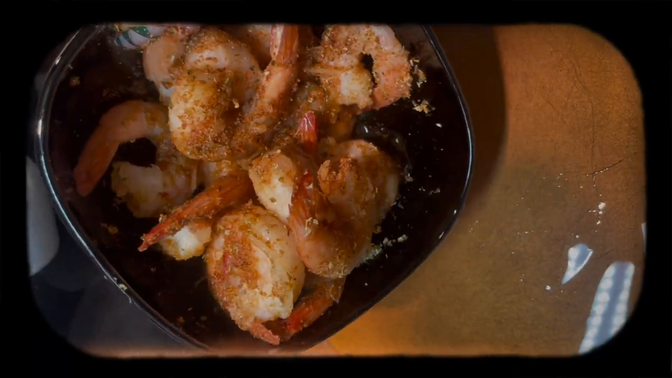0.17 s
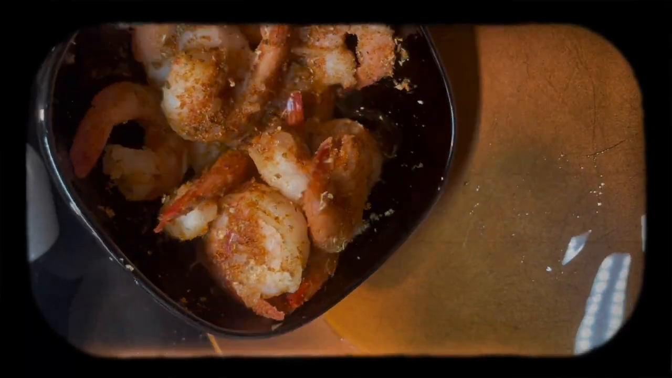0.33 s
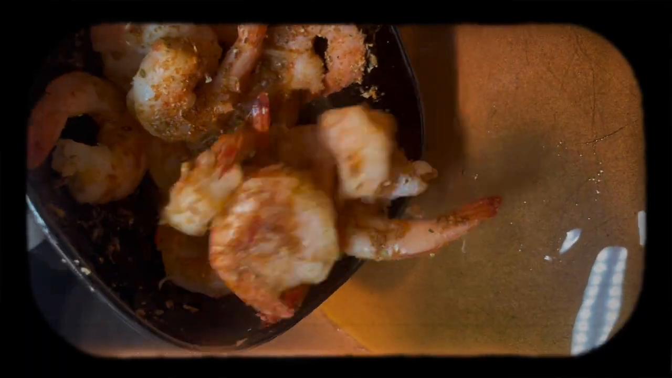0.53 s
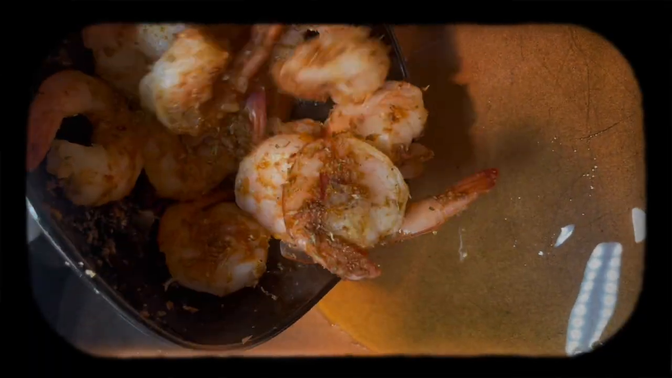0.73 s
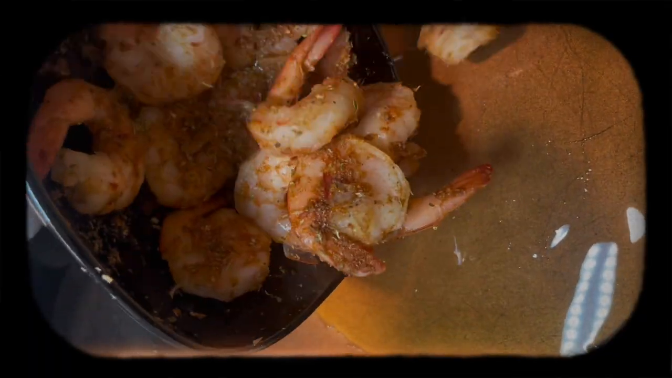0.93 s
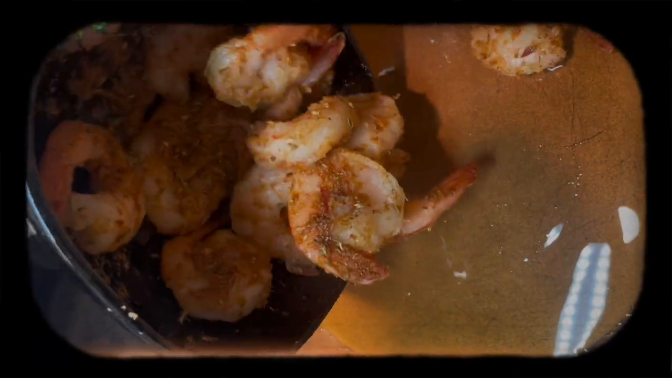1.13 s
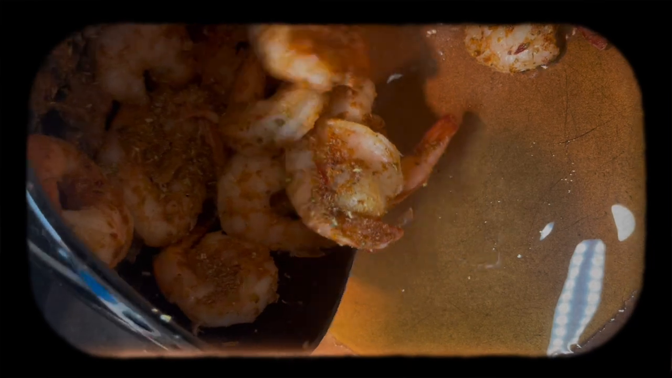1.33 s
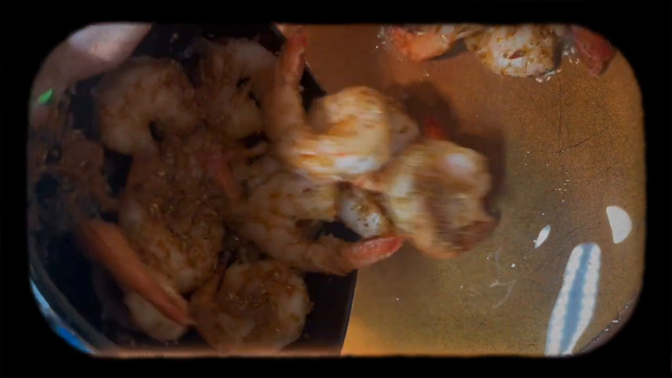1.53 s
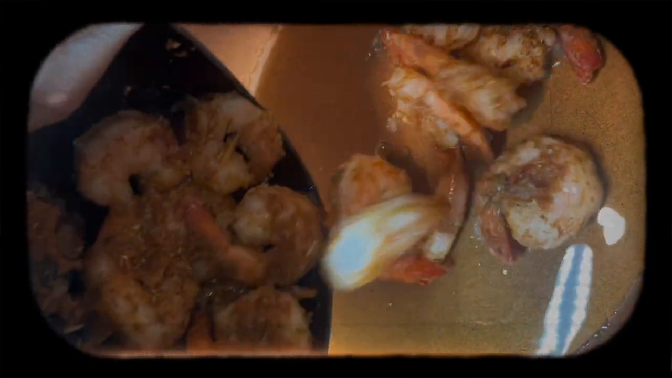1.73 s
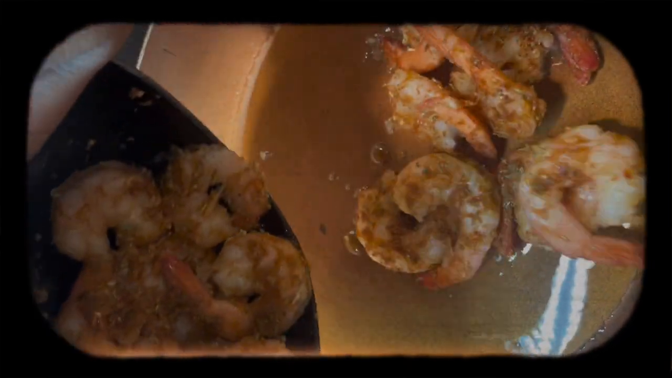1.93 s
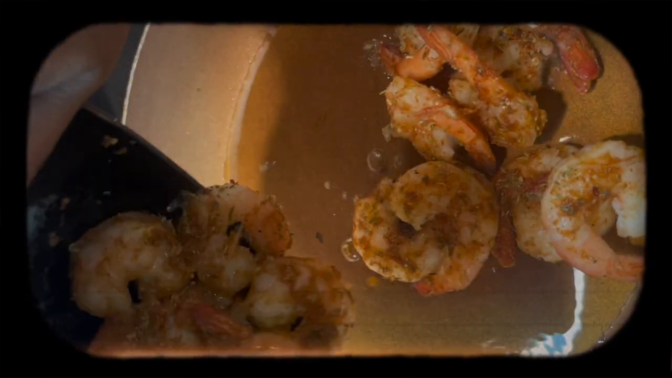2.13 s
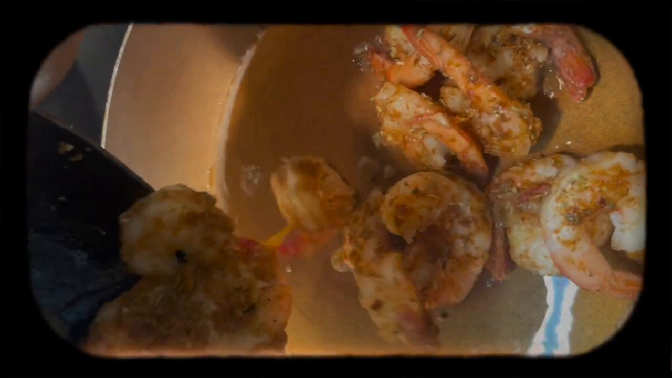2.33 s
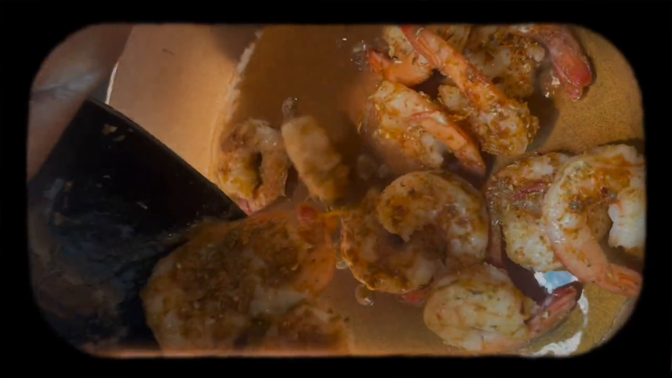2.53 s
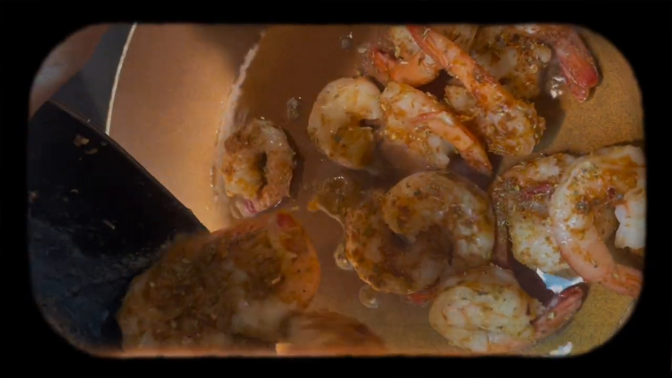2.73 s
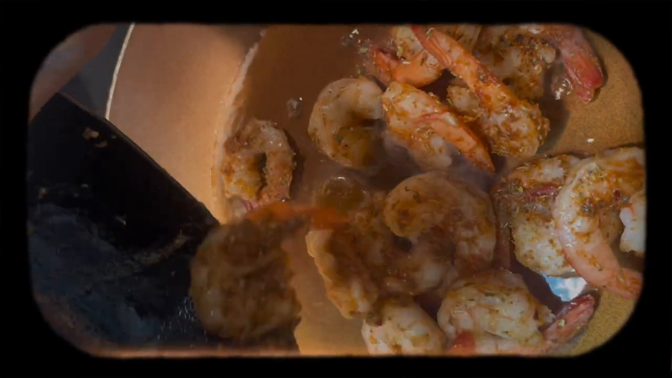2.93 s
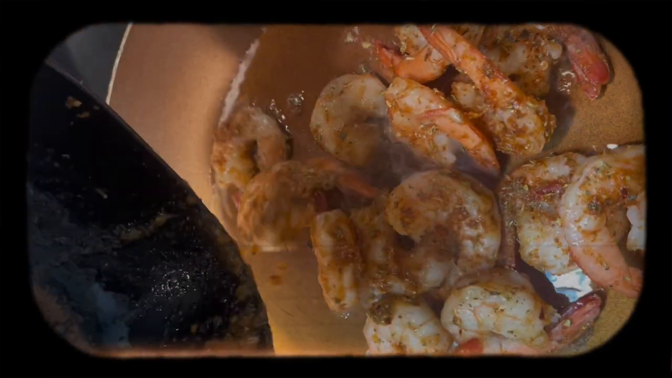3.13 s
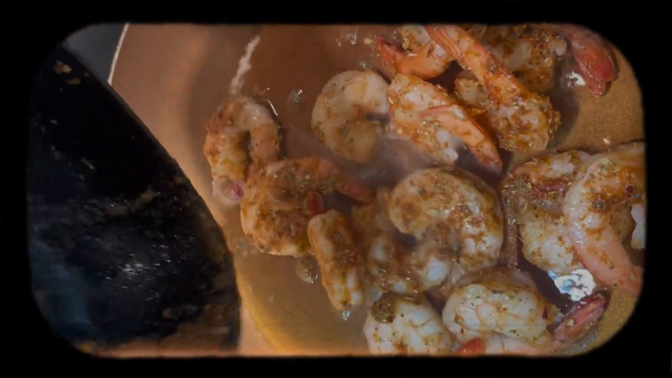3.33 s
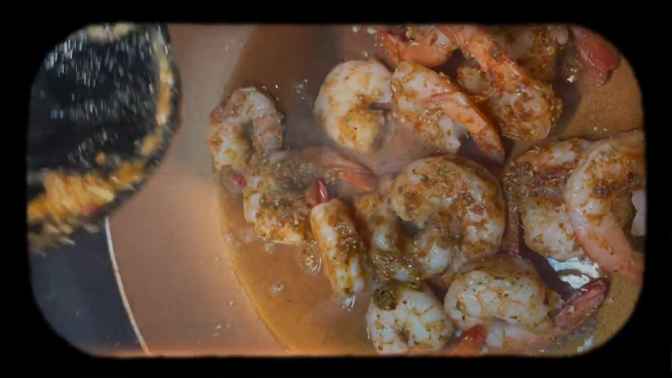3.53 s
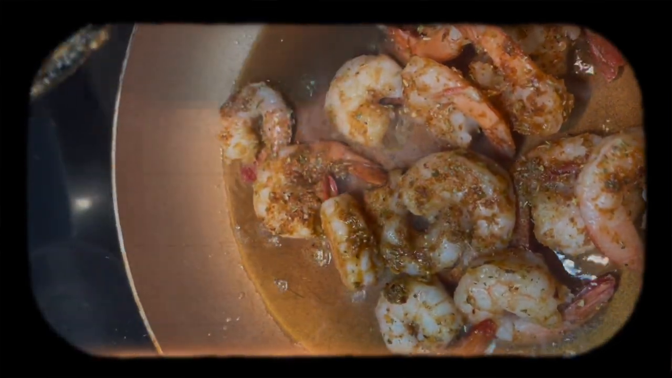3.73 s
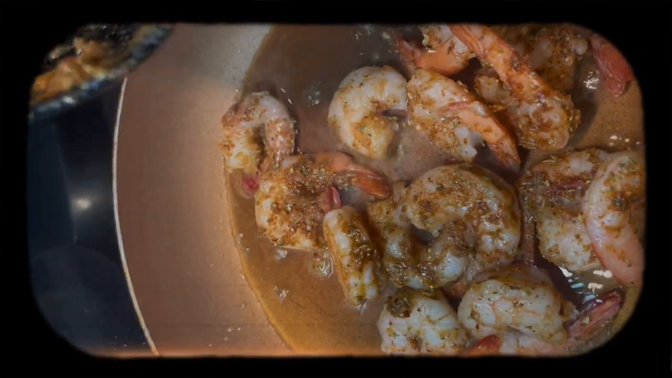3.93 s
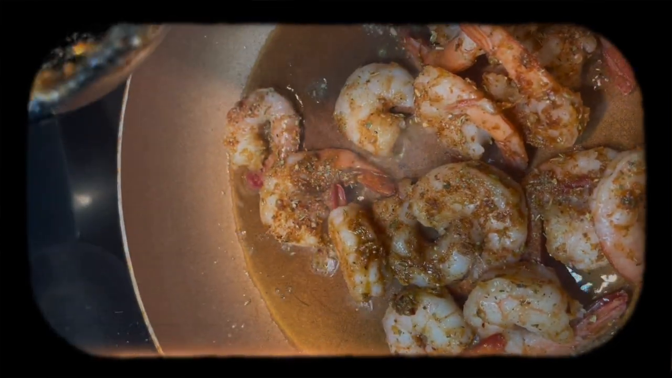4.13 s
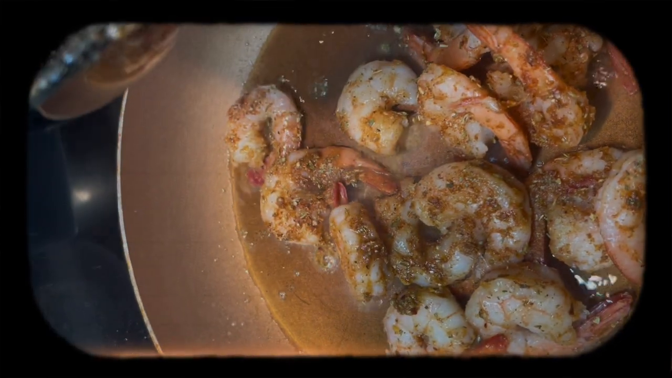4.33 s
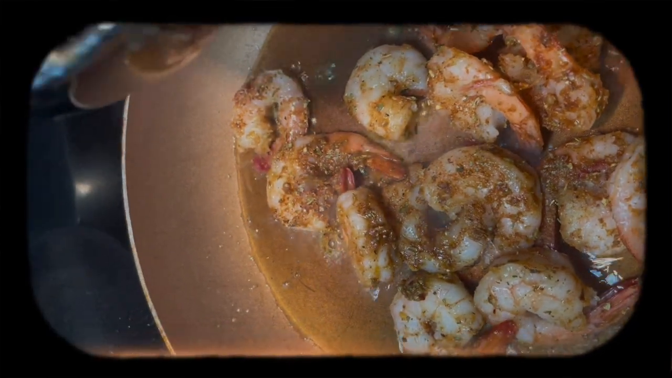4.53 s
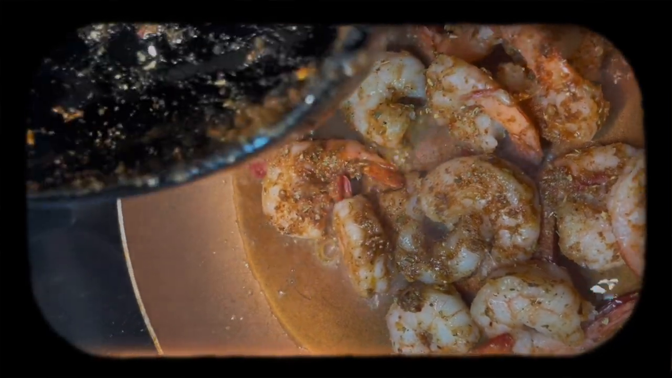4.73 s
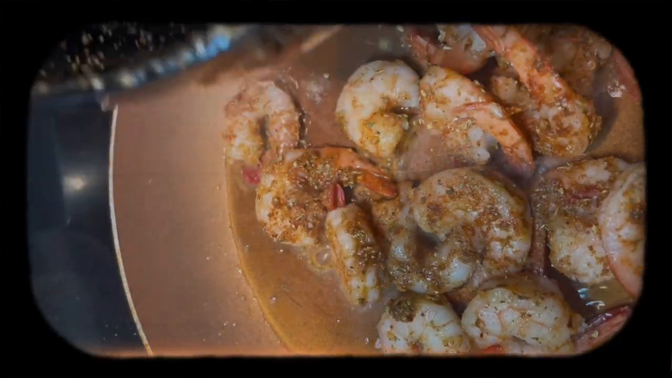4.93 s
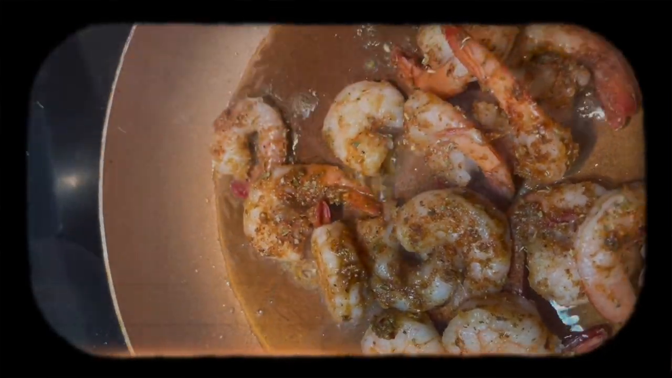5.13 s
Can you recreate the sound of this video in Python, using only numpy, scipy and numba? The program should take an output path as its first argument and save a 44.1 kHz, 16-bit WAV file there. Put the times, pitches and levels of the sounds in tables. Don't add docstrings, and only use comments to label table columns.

```python
import sys
import numpy as np
from scipy import signal
from scipy.fft import rfft, irfft, next_fast_len
from scipy.io import wavfile
from scipy.ndimage import uniform_filter1d
from numba import njit

SR = 44100
rng = np.random.default_rng(int(sys.argv[2]) if len(sys.argv) > 2 else 0)


def amplitude_ratio(level_db):
    exponent = np.asarray(level_db, float) / 20
    return 10 ** exponent


def store_wav(level_fs):
    pcm = np.round(np.clip(np.atleast_2d(level_fs), -1, 1) * 32767)
    wavfile.write(sys.argv[1], SR, pcm.T.astype(np.int16))


N = 228658
SIZE = next_fast_len(N + SR // 2)
HZ = np.arange(SIZE // 2 + 1) * SR / SIZE
TIME = np.arange(N) / SR
SIDE = np.array([[1], [-1]])


def unit(x):
    return x / np.sqrt(np.mean(x ** 2))


def across(table):
    hz, value = np.transpose(table)
    return np.interp(np.log(HZ + 1), np.log(hz + 1), value)


def walk(rate):
    k = int(SR / rate)
    steps = np.repeat(rng.standard_normal(N // k + 1), k)
    return unit(uniform_filter1d(uniform_filter1d(steps, k), k)[:N])


def highpass(x, hz, order=2):
    return signal.sosfilt(signal.butter(order, hz, "high", fs=SR, output="sos"), x)


@njit
def rings(s, hz, t60, size, glide):
    out = np.zeros(N)
    for k in range(len(s)):
        start, count = int(s[k] * SR), int(t60[k] * SR)
        phase, step, gain = 0., 2 * np.pi * hz[k] / SR, size[k]
        bend, fade = glide ** (1 / (count + 1)), 1000 ** (-1 / (count + 1))
        for i in range(start, min(start + count, N)):
            out[i] += gain * np.sin(phase)
            phase, step, gain = phase + step, step * bend, gain * fade
    return out


# pitch in Hz, level in dB.
MOTOR_HUM = [(59.2, -44), (118.4, -54.5)]
# frequency in Hz, level in dB per Hz.
ROOM_AIR = [(44, -7), (75, -6), (90, -8.5), (188, -14.5), (211, -18.5), (230, -14.5), (395, -10),
            (517, -31), (618, -25), (1080, -34), (16000, -83)]
# frequency in Hz, likeness 0-1.
AIR_LIKENESS = [(60, 1), (110, 1), (200, 0.8), (400, 0.86), (800, 0.04), (8000, 0.2)]


def kitchen():
    hum = np.zeros(N)
    for hz, line_db in MOTOR_HUM:
        level = amplitude_ratio(line_db - MOTOR_HUM[0][1] + 0.5 + 0.31 * walk(5.5))
        hum = hum + level * np.sin(2 * np.pi * hz * TIME + 0.36 * walk(4.13))
    mid, side = rfft(rng.standard_normal((2, SIZE))) * amplitude_ratio(across(ROOM_AIR)) * (HZ > 30)
    alike = np.clip(across(AIR_LIKENESS), 0, 1)
    air = irfft(mid * np.sqrt(1 + alike) + SIDE * side * np.sqrt(1 - alike), SIZE)[:, :N]
    fade_in = amplitude_ratio(np.interp(TIME, [0.61, 2.54], [-56.5, -49.5]))
    return fade_in * (hum + amplitude_ratio(-6.5) * unit(air))


# start in seconds, frying level added in dB.
BATCHES = [(0.887, -48.5), (1.40, -44), (1.55, -57), (1.68, -40), (1.80, -47), (1.93, -37.5), (2.18, -38),
           (2.402, -33.5), (2.60, -39), (2.90, -37.5), (3.15, -36)]
FIRST_BATCH_S = BATCHES[0][0]
BOWL_LEAVES_S, BOWL_DB = 3.46, 1.5


def boil(shape, drip_db, bowl_db=BOWL_DB):
    s, db = np.transpose(BATCHES)
    age = np.maximum(TIME - s[:, None], 0)
    sag = amplitude_ratio(-3 * (1 - np.exp(-age / 0.7)))
    power = ((age > 0) * (amplitude_ratio(db)[:, None] * sag * shape(age)) ** 2).sum(axis=0)
    drips = amplitude_ratio(-100 + drip_db + 49 * (np.minimum(TIME, s[0]) - 0.31))
    bowl = amplitude_ratio(bowl_db / (1 + np.exp((TIME - BOWL_LEAVES_S) / 0.0084)))
    return bowl * np.sqrt(power + drips ** 2)


def fizz_gain():
    return boil(lambda age: 1 - np.exp(-age / 0.21), drip_db=1.5)


def juices_gain():
    return boil(lambda age: 0.38 + 1.53 * (1 - np.exp(-(age / 2.03) ** 2)), drip_db=-1, bowl_db=0.0)


def flares(s, size):
    hits = np.zeros(N)
    hits[(s * SR).astype(int)] = size
    return signal.lfilter([1], [1, -np.exp(-1 / (.002 * SR))], hits)


# start in seconds, peak in dB.
SPLASH_DROPLETS = [(1.279, -23), (1.752, -18.5), (1.934, -20.5), (2.198, -26), (2.2817, -31), (2.317, -20),
                   (2.4072, -13), (2.497, -9), (2.5385, -10), (2.616, -18), (2.6867, -14), (2.736, -20),
                   (2.8843, -12), (2.965, -14), (3.027, -29), (3.1102, -24), (3.1556, -13), (3.2633, -10),
                   (3.386, -16), (3.4723, -14), (3.7563, -24), (3.851, -23), (4.044, -11), (4.815, -16),
                   (4.909, -8), (4.9666, -16), (5.039, -17), (5.165, -8.5)]


def mist_gain():
    def shape(age):
        wetting = np.minimum(age / 0.0067, 1)
        return wetting * amplitude_ratio(1 + 2 * np.exp(-age / 0.071))
    s, db = np.transpose(SPLASH_DROPLETS)
    return boil(shape, drip_db=4.5) + flares(s, amplitude_ratio(db - 8))


def spatter(count):
    when, size = rng.random((count, 2)).T
    return 1 + flares(when * N / SR, -np.log(1 - .9 * size) * amplitude_ratio(-8))


def bubbles(count, low_hz, top_hz, cycles, scatter_db):
    when, pitch, size = rng.random((count, 3)).T
    hz = low_hz + (top_hz - low_hz) * pitch
    loud = amplitude_ratio(-scatter_db * np.log(1 - .997 * size)) * np.sqrt(hz / top_hz)
    return unit(rings(when * N / SR, hz, cycles / hz, loud, 1.34))


def patches(x):
    return np.array([np.roll(x, k * N // 3) for k in range(3)])


def sizzle():
    middle = bubbles(count=70000, low_hz=217.5, top_hz=9530.0, cycles=33.0, scatter_db=2.5)
    fine = bubbles(count=90000, low_hz=8640.0, top_hz=18130.0, cycles=16.0, scatter_db=3.0)
    crackle = bubbles(count=9000, low_hz=3000., top_hz=15250.0, cycles=4., scatter_db=2.2)
    large = bubbles(count=12000, low_hz=316.0, top_hz=3440.0, cycles=38.0, scatter_db=1.5)
    surge = amplitude_ratio(3.5 + .6 * walk(12) + .5 * walk(60)) * spatter(count=260)
    fizz = fizz_gain() * (patches(middle) * amplitude_ratio(.6 * walk(14)) + amplitude_ratio(-2.5) * patches(crackle))
    mist = mist_gain() * patches(fine) * amplitude_ratio(.5 * walk(3.1))
    juices = juices_gain() * amplitude_ratio(-8.5 + 0.67 * walk(7.4)) * patches(large)
    return surge * (fizz + mist + juices)


# start in seconds, peak in dB, length in seconds, treble tilt in dB.
STEAM_SPITS = [(0.338, -58, 0.0067, 5), (0.3994, -63, 0.005, 0), (0.4216, -48, 0.003, 2.5),
               (0.45, -55, 0.004, 2), (0.486, -47.5, 0.006, 14), (0.496, -41, 0.013, 2),
               (0.527, -53, 0.0067, 14), (0.5475, -48, 0.005, 2), (0.577, -51, 0.004, 14),
               (0.593, -49, 0.0035, 13), (0.5995, -41, 0.003, 0), (0.6226, -51, 0.004, 1),
               (0.643, -47, 0.004, -6), (0.675, -51, 0.002, 14), (0.681, -50.5, 0.0036, 14.5),
               (0.687, -54, 0.0036, 4), (0.726, -58, 0.0046, 7), (0.759, -37, 0.0024, -7),
               (0.8, -46, 0.002, 4), (0.808, -39.5, 0.0044, 4.5), (0.886, -37.5, 0.13, 10),
               (1.0929, -18.5, 0.0023, 5), (1.281, -35, 0.0043, 10), (1.572, -21, 0.0044, -5),
               (2.135, -12, 0.0016, -1), (2.398, -18, 0.0036, 2), (2.741, -12.5, 0.0055, 13.5)]


def spits():
    dull, bright = np.zeros((2, N))
    for s, db, length, tilt_db in STEAM_SPITS:
        age = np.maximum(TIME - s, 0) / max(length, .001)
        shape = (TIME >= s) * amplitude_ratio(db - 12.0) * (np.exp(-age ** 2) + 0.16 * np.exp(-age / 4))
        dull = dull + shape
        bright = bright + shape * amplitude_ratio(tilt_db)
    spray = rng.standard_normal((3, N)) * amplitude_ratio(2.0 * walk(500))
    low = signal.sosfilt(signal.butter(2, 6000, "low", fs=SR, output="sos"), spray)
    return dull * low + bright * highpass(spray, 6000)


# frequency in Hz, level in dB per Hz.
FRY_COLOUR = [(250, -16.0), (500, -15.3), (1000, -15.3), (1500, -12.1), (2000, -7.9), (2700, -4.2),
              (3400, -3.4), (4800, -4.2), (6300, 0.0), (8000, -1.0), (10000, -2.2), (11300, -3.3),
              (13500, -2.9), (15500, -7.0)]


def frying():
    bass_dip = 1.2 / (1 + (HZ / 1200) ** 6)
    middle_dip = 2.04 * np.exp(-((HZ - 1900) / 600) ** 4) + 0.27 * np.exp(-((HZ - 3400) / 900) ** 2)
    colour = amplitude_ratio(across(FRY_COLOUR) + 3.0 - bass_dip - middle_dip)
    near, *far = sizzle() + spits()
    age = TIME - FIRST_BATCH_S
    spread = amplitude_ratio(-9.5 * (age > 0) * np.exp(-(age / .5) ** 2))
    return rfft([near, *(far * spread)], SIZE) * colour


def pops(table, cycles, boost_db, spread, tick_db):
    s, db, hz = np.repeat(np.transpose(table), 3, axis=1)
    late, off = rng.random((len(s), 2)).T
    step = np.tile([0, -1, 1], len(table))
    pitch = hz * (1 + spread * step * (.5 + off))
    rise = 1.08
    tick_hz = hz * (1 + 1.6 * off)
    tick = rings(s + 0.00024 * off, tick_hz, 6 / tick_hz, amplitude_ratio(db + tick_db), rise)
    level = amplitude_ratio(db + boost_db - 4.5 * step ** 2)
    return tick + rings(s + .0006 * late * step ** 2, pitch, cycles / pitch, level, rise)


# start in seconds, peak in dB, pitch in Hz.
DRIP_TICKS = [
    (0.4838, -41.5, 3280),
    (0.4884, -41, 3100),
    (0.5756, -48, 3030),
    (0.576, -55, 1135),
    (0.6804, -41.5, 2480),
    (0.681, -44.5, 1900),
    (0.808, -62, 2360),
    (1.04, -40, 2550),
    (1.0935, -44, 2460),
]


def ticks():
    return highpass(pops(DRIP_TICKS, cycles=32., boost_db=-2, spread=.08, tick_db=-14), 600)


# start in seconds, peak in dB, pitch in Hz, ring in seconds.
PIECE_THUDS = [(0.885, -43.5, 71.6, 0.072), (1.551, -40.5, 160.5, 0.12), (1.58, -39.5, 135, 0.049),
               (1.679, -39, 70.5, 0.15), (1.78, -38.5, 73, 0.062), (1.869, -42.5, 133, 0.079),
               (2.241, -39.5, 96, 0.087), (2.268, -36.5, 72, 0.058), (2.339, -35.5, 70.6, 0.039),
               (2.405, -40, 91, 0.1), (2.497, -34, 100, 0.092), (2.532, -34.5, 81, 0.067),
               (2.574, -34, 142, 0.083), (2.599, -39, 316, 0.085), (2.899, -39, 107, 0.1)]


def thuds():
    s, db, hz, t60 = np.transpose(PIECE_THUDS)
    knock = rings(s, hz, t60, amplitude_ratio(db), 0.8)
    return knock + rings(s + 0.00377, 2.65 * hz, 0.62 * t60, amplitude_ratio(db - 5), 0.36)


# start in seconds, peak in dB, pitch in Hz.
FAT_BUBBLES = [(0.985, -35, 2220), (1.229, -37, 2340), (1.397, -38.5, 1850), (1.471, -44.5, 1000),
               (1.549, -33.5, 985), (1.58, -38.5, 1140), (1.684, -37.5, 870), (1.774, -31.5, 1930),
               (1.919, -30.5, 2480), (1.959, -34, 1800), (2.143, -24, 1750), (2.376, -29, 1780),
               (2.403, -26.5, 1830), (2.462, -26, 2060), (2.577, -30, 1117), (2.783, -41, 2460),
               (2.878, -28, 2550), (2.966, -50, 2460), (3.525, -34, 2350), (3.609, -31, 2340),
               (3.989, -22, 1850), (4.09, -35, 2520), (4.351, -34, 1990), (4.484, -33, 1880),
               (4.907, -23, 1740), (4.96, -30, 2190), (5.021, -27, 2360)]


def plops():
    return pops(FAT_BUBBLES, cycles=75.0, boost_db=-10.5, spread=0.23, tick_db=-1.5)


# start in seconds, peak in dB, pitch in Hz.
FILLING_CRACKS = [(1.0575, -35, 7200), (1.0938, -31.5, 5700), (1.122, -38, 6000), (1.2286, -37, 6570),
                  (1.2545, -34, 6850), (1.286, -32, 5900), (1.3294, -39, 6500), (1.3972, -30, 4840),
                  (1.5803, -23.5, 7500), (1.7193, -30, 6060), (1.7895, -22, 6000), (1.938, -26, 7440),
                  (2.1421, -18, 5270), (2.4034, -28, 7320), (2.4727, -15, 6640), (2.5376, -14.5, 4640),
                  (2.6134, -20, 6300), (2.6868, -7, 6170), (2.7413, -10, 6060), (2.8454, -11, 6260),
                  (2.8918, -14, 5940)]
# start in seconds, peak in dB, pitch in Hz.
FULL_PAN_CRACKS = [(2.9948, -22, 6690), (3.0443, -22, 6590), (3.08, -30, 6030), (3.1378, -19, 5900),
                   (3.169, -9, 7170), (3.2143, -7, 7400), (3.2487, -11, 7960), (3.315, -6, 7960),
                   (3.388, -13, 6270), (3.4071, -6, 7200), (3.491, -12, 6300), (3.5315, -22, 6500),
                   (3.5669, -21, 6500), (3.6039, -17.5, 6500), (3.7036, -18, 6240), (3.7285, -30, 6900),
                   (3.7555, -14, 6100), (3.798, -3, 7940), (3.8797, -22, 5830), (3.9007, -19, 6180),
                   (3.9476, -18, 6530), (3.9767, -16, 6360), (4.012, -17, 5700),
                   (4.0095, -18, 6550), (4.0377, -12, 6000), (4.1263, -30, 5910), (4.143, -12, 6340),
                 (4.1791, -16, 5740), (4.1944, -10.5, 6100), (4.2335, -31, 5600), (4.2497, -14, 6360),
                 (4.3006, -29, 6360), (4.3999, -7, 5880), (4.4134, -24, 6440), (4.4837, -20, 6200),
                 (4.5117, -13, 6440), (4.6194, -17, 6240), (4.7312, -14, 6590), (4.7576, -16, 6100),
                 (4.8873, -24, 6630), (4.905, -12, 6820), (4.945, -27, 5400), (4.9674, -12.5, 5770),
                 (5.041, -19, 5700), (5.0926, -21, 5600), (5.135, -23, 6030), (5.155, -11, 6030),
                 (5.1634, -21, 6370)]


def cracks():
    filling = pops(FILLING_CRACKS, cycles=28., boost_db=3, spread=.15, tick_db=-3)
    full_pan = FULL_PAN_CRACKS
    full = pops(full_pan, cycles=30., boost_db=.8, spread=.15, tick_db=-9)
    return highpass(filling + full, 2500)


def echoes(x, t60):
    age = np.arange(SR // 8) / SR
    tails = rng.standard_normal((2, len(age))) * 1000 ** (-age / t60)
    return rfft(x, SIZE) * rfft(tails / np.sqrt(np.sum(tails[0] ** 2)), SIZE)


# frequency in Hz, lead in radians.
LEFT_LEAD = [(0, 0), (900, .4), (1900, 0), (2200, -.2), (2900, -1.8), (4400, -2.1), (4720, -np.pi),
             (4850, -np.pi), (5150, -2 * np.pi), (5500, -2 * np.pi), (8100, -4.2), (10400, -np.pi),
             (15600, 0), (22050, 0)]
# frequency in Hz, share 0-1.
DIRECT_SHARE = [(200, .9), (900, .7), (1500, .9), (2200, .92), (2500, .7), (2800, .3), (4200, .33),
                (4640, .4), (4790, .8), (4930, .35), (5250, .7), (5500, .78), (6300, .6), (8000, .78),
                (10000, .9), (12500, .68), (14800, .96)]
# frequency in Hz, left minus right in dB.
LEFT_OVER_RIGHT = [(60, 0.0), (110, 0.5), (200, 0.5), (380, 0.5), (700, -2.0), (1290, -1.0), (2380, -2.0),
                   (4400, -0.5), (8120, 0.0), (15000, 0.0)]


def ports(direct, scattered):
    share = np.clip(across(DIRECT_SHARE), 0, 1)
    lead = np.interp(HZ, *np.transpose(LEFT_LEAD))
    both = np.sqrt(share) * np.exp(.5j * SIDE * lead) * direct + np.sqrt(1 - share) * scattered
    return irfft(both * amplitude_ratio(SIDE * across(LEFT_OVER_RIGHT) / 2), SIZE)[:, :N]


def scene():
    room = kitchen()
    fry = frying()
    small = ticks()
    bursts = plops() + cracks()
    rattle = amplitude_ratio(-3) * echoes(bursts, t60=0.05) + echoes(small, t60=.02)
    pan = ports(fry[0] + rfft(bursts + small, SIZE), fry[1:] + rattle)
    return pan + thuds() + room


def top_cut(x):
    return signal.sosfilt(signal.butter(12, 17000, fs=SR, output="sos"), x)


def record(dry):
    heard = highpass(dry, 44, order=4)
    hiss = signal.lfilter([1, 1], [1, -.3], rng.standard_normal(dry.shape))
    return top_cut(heard + amplitude_ratio(-92) * hiss)


dry = scene()
out = record(dry)
store_wav(out)
```